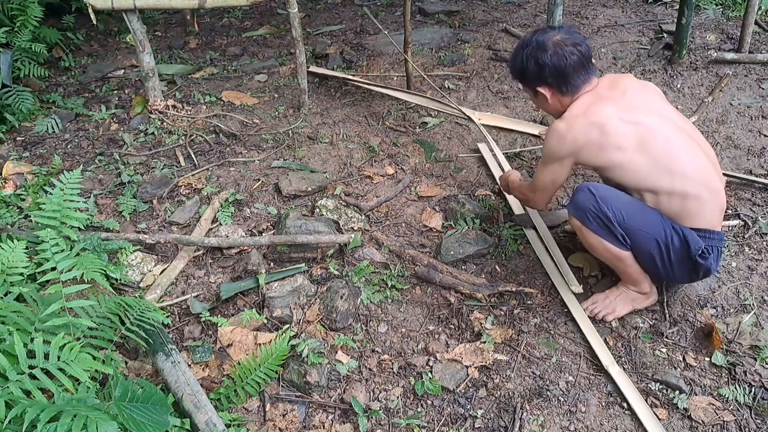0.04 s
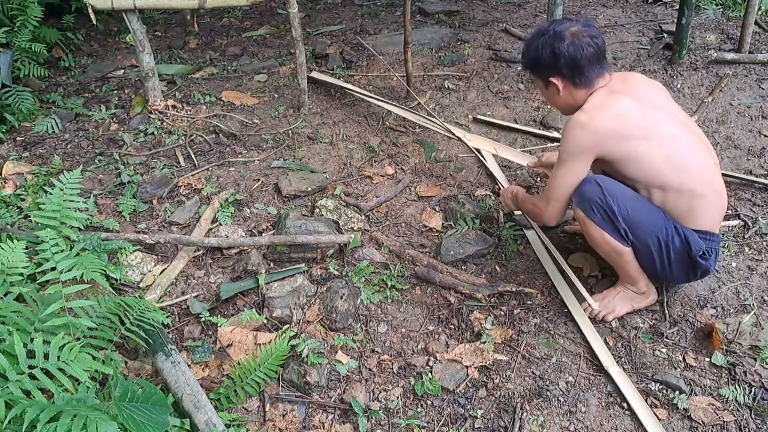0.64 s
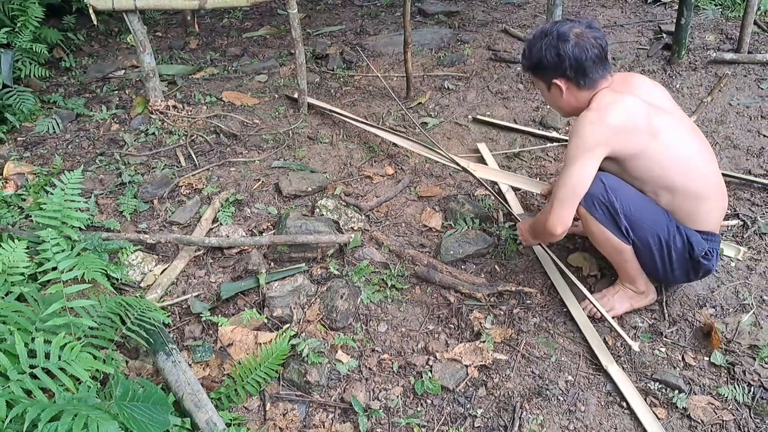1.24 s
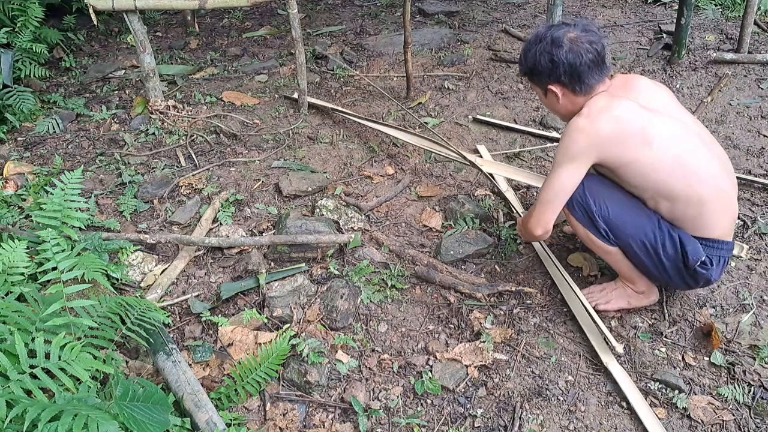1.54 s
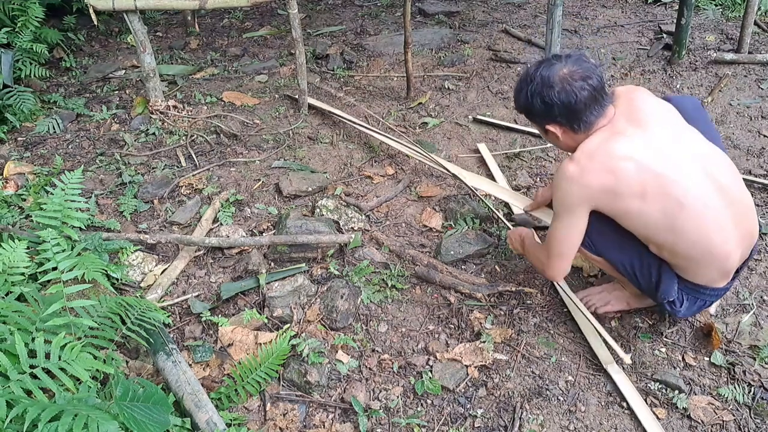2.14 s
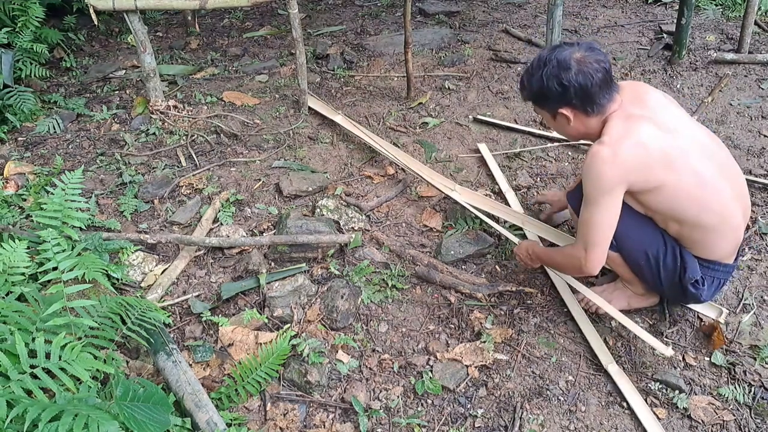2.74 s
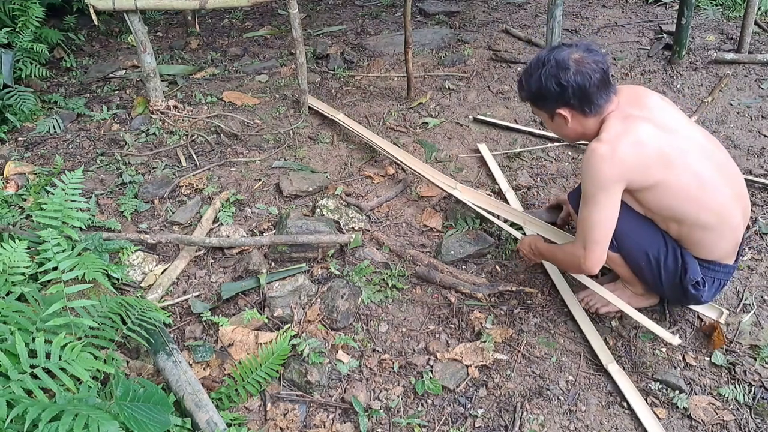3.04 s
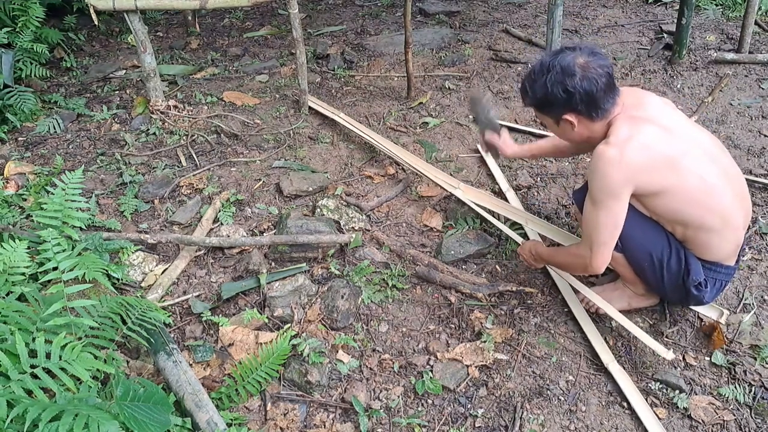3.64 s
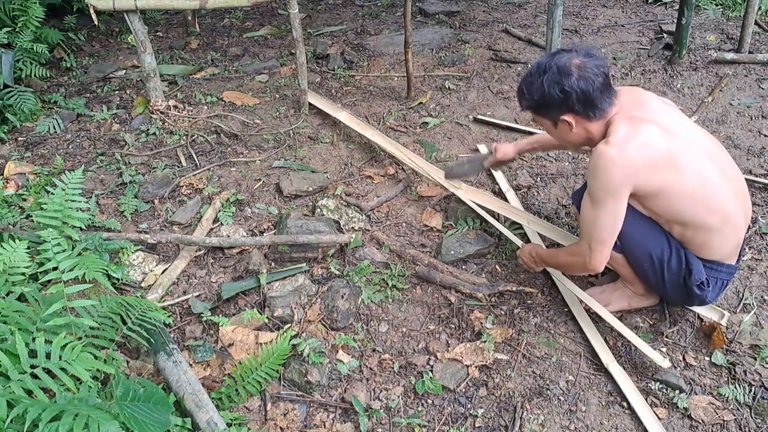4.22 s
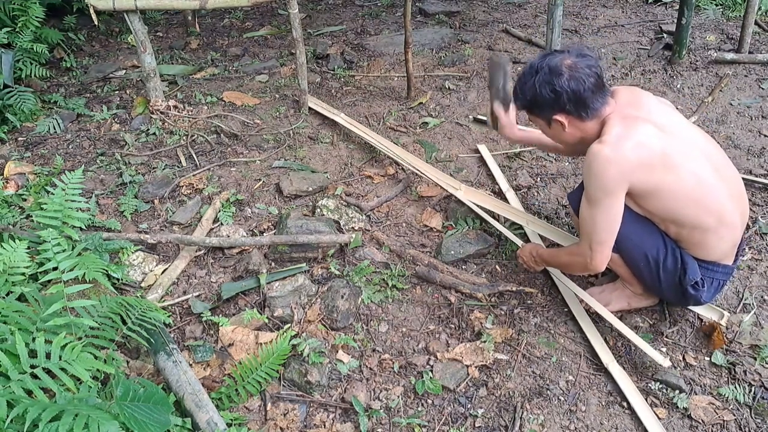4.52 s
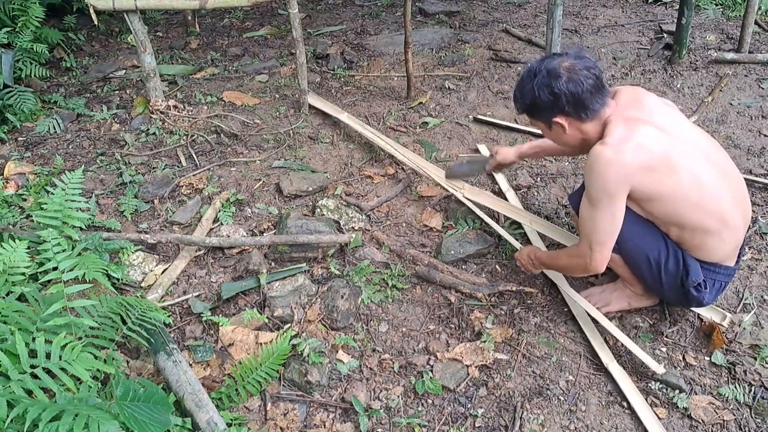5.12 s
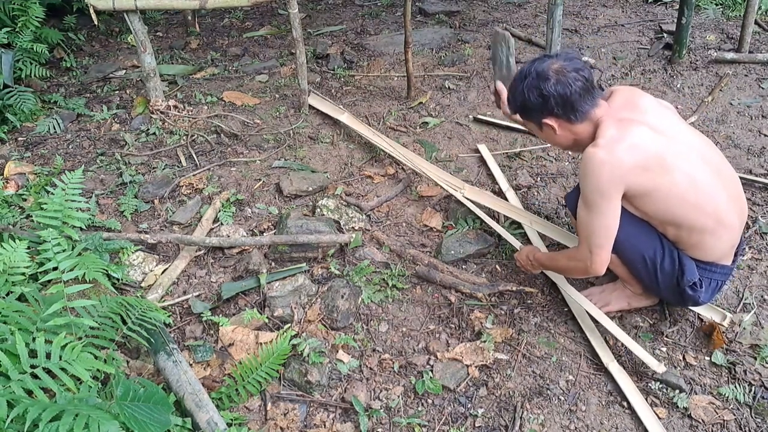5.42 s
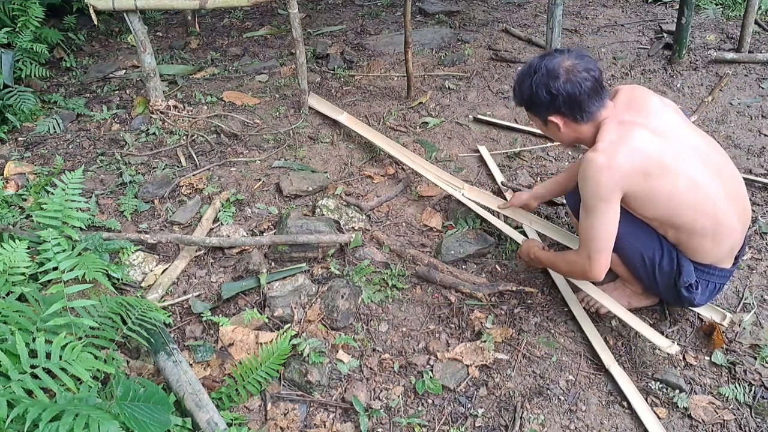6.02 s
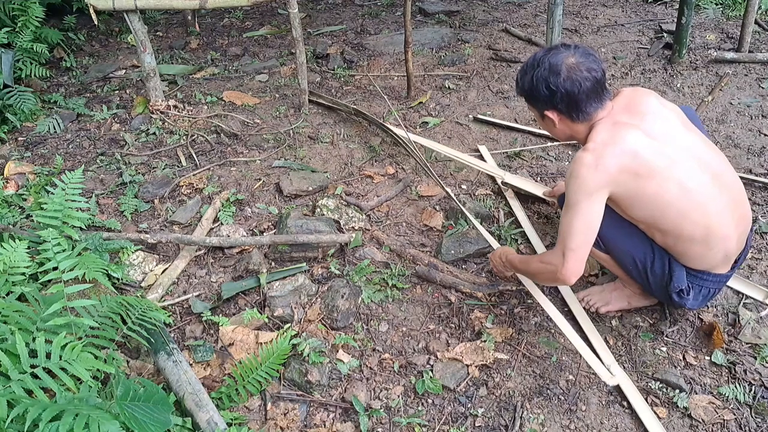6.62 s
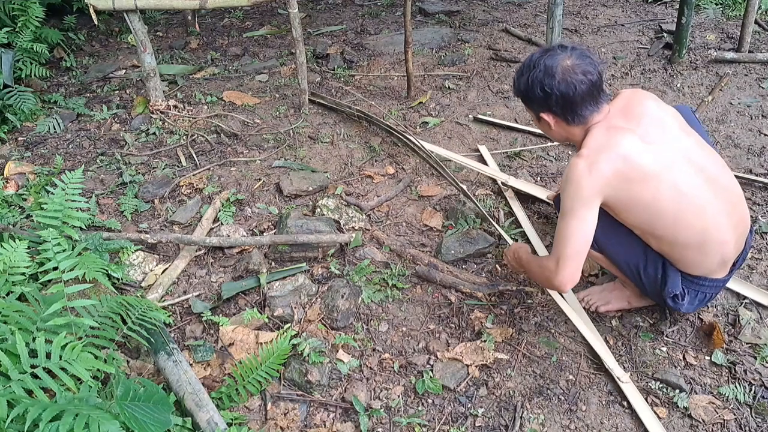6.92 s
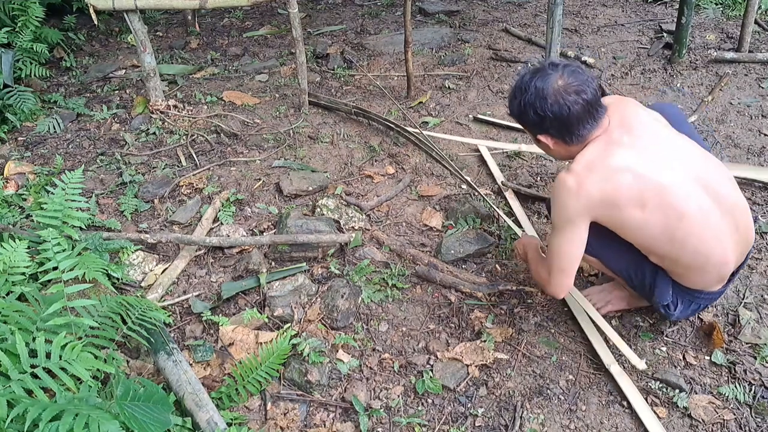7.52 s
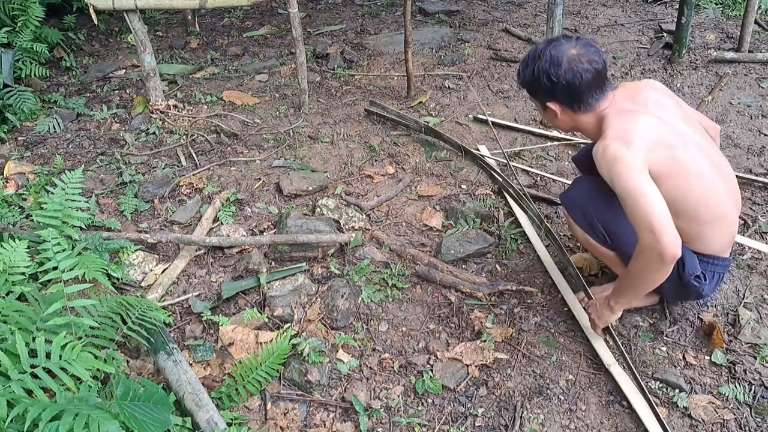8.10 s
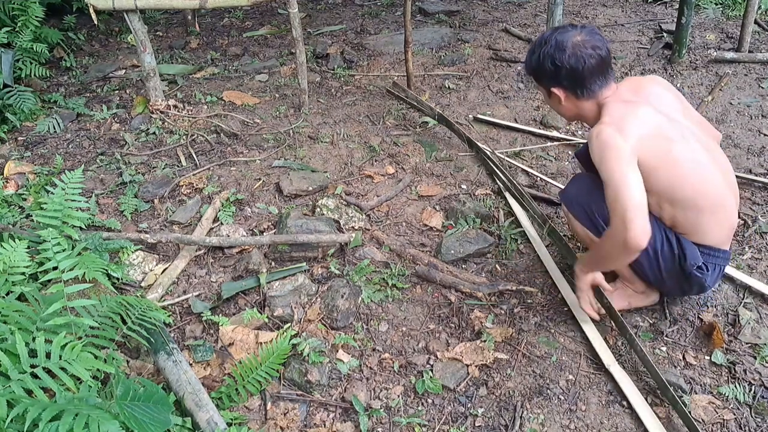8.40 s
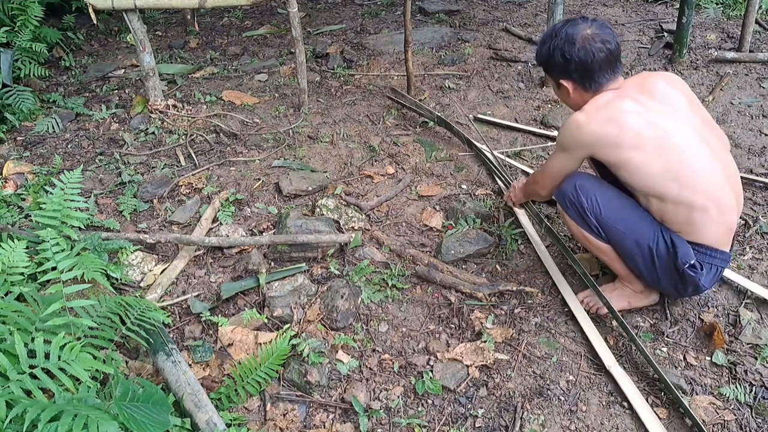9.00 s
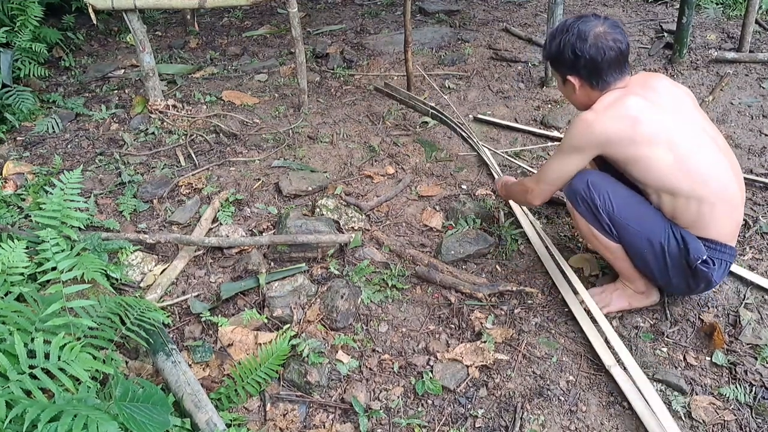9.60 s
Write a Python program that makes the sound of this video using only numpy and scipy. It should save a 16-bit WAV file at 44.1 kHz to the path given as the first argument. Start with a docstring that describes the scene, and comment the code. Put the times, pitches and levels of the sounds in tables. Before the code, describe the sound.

Bamboo strips click and scrape on leafy ground, take four sharp chops, then split briefly, over steady high insect buzz.

```python
"""A heavy blade chops long bamboo strips four times, making them ring and rattle on each other.
Someone works them on a forest floor: the strips click together, thud on the soil and scrape through
dry leaves, twigs snap, and after the chops one strip rips apart fibre by fibre. Insects buzz steadily
in the trees over a distant hush; trunks and leaves scatter every knock back."""
import sys
import numpy as np
from scipy import signal
from scipy.fft import rfft, irfft
from scipy.io import wavfile

SR = 44100
rng = np.random.default_rng(int(sys.argv[2]) if len(sys.argv) > 2 else 0)


def pcm_store(signal):
    """Save signal as 16-bit PCM."""
    levels = np.round(np.clip(np.atleast_2d(signal), -1, 1) * 32767)
    wavfile.write(sys.argv[1], SR, levels.astype(np.int16).T)


N = 429975
TIME = np.arange(N) / SR

# the ways a strip rings; t60 is the time to fade by 60 dB: (pitch [Hz], level [dB], t60 [s])
STRIP_MODES = [(61.7, -16, 0.0966), (123.8, -16, 0.29), (247, -4.5, 0.1), (321, -3.5, 0.13),
               (388.4, -4, 0.13), (537, -3, 0.047), (808.4, 10, 0.14), (1040, -10, 0.083),
               (1250, -13, 0.135), (1279, 12, 0.077), (1538, -8.5, 0.285), (1637, -5, 0.125),
               (1738.4, 11.5, 0.14), (2099, -15.5, 0.17), (2410, 9, 0.15), (2530, 9, 0.183),
               (2550, -3, 0.205), (2910, -14.5, .18), (3670, -43, .22), (4538, -1.5, 0.194), (5250, 1, 0.2),
               (5612, -18.5, .22)]
# tone of the blade's bite and of the rattle after it: (frequency [Hz], level [dB])
BITE_TONE = [(60, -29), (170, -5), (350, 2), (560, -7), (900, -1), (1600, 2.5), (2600, 1.5), (4500, -8.5),
             (7500, -8), (11000, -15.5), (15000, -18.5)]
RATTLE_TONE = [(120, -11), (350, 6.5), (600, 2), (1000, 3.5), (1700, 5), (2600, 4.5), (4500, 1),
               (8000, -2.5), (15000, -14)]
# blows of the blade: (time [s], bite [dB], knock [dB], knock's first pitch [Hz], ring [dB],
# rattle [dB], rattle t60 [s])
CHOPS = [(3.859, -19, -18, 1636, -24, -24.5, 0.18), (4.3023, -19, -14.5, 2350, -22.5, -22.5, 0.1),
         (4.7425, -17, -26, 2420, -26.5, -21.5, 0.12), (5.1973, -19, -15.5, 1876, -25, -21, 0.21)]
def chops(travel_s=0.00596, knock_t60=0.02, bite_t60=0.036, crush_s=0.0072, rattle_rise_s=0.028):
    """The blade lands and crushes fibres for a moment; the strips ring and rattle on each other."""
    out, t = np.zeros((2, N)), TIME[:SR // 2]
    for start, bite_db, knock_db, knock_hz, ring_db, rattle_db, rattle_t60 in CHOPS:
        # high bending waves run along the strip faster than low ones, so the knock falls in pitch
        knock = -np.sin(2 * np.pi * knock_hz * t / (1 + t / travel_s)) * fade(t, knock_t60)
        bite = crackle(per_s=4500, spread_db=0.5, size=len(t))
        bite *= fade(np.maximum(t - crush_s, 0), bite_t60)
        rattle = crackle(per_s=1800, spread_db=3.0, size=len(t))
        rattle *= fade(t, rattle_t60) * (1 - fade(t, rattle_rise_s))
        add(out, start, from_db(knock_db) * with_energy(knock, 0.0044))
        add(out, start, from_db(bite_db) * with_energy(colour(bite, BITE_TONE), 0.021))
        add(out, start, from_db(ring_db) * with_energy(ring(t, STRIP_MODES), 0.007))
        add(out, start, from_db(rattle_db) * with_energy(colour(rattle, RATTLE_TONE), 0.07))
    return out


def ring(t, modes, scatter_db=1.0):
    """A struck strip rings at many pitches; each blow shares its energy out a little differently."""
    hz, db, t60 = np.array(modes).T[:, :, None]
    strength = from_db(db + scatter_db * rng.standard_normal(hz.shape))
    strength[1::2] *= -1   # neighbouring modes swing in opposite directions
    detune = 1 + 0.003 * rng.standard_normal(hz.shape)   # the grip on the strip shifts
    return np.sum(strength * np.sin(2 * np.pi * hz * detune * t) * fade(t, t60), axis=0)


# sharp clicks: (time [s], wood [dB], snap [dB], ring pitch [Hz], ring width [Hz])
CLICKS = [(0.03, -55, -34, 4500, 4000), (.038, -42.5, -51, 4950, 4000), (0.068, -45, -34.5, 2000, 2000),
          (.681, -47, -59, 5470, 4000), (0.7207, -48.5, -49, 2900, 2000), (.834, -49.5, -54, 3480, 3000),
          (0.8638, -45.5, -65, 2400, 800), (0.884, -45, -63, 2730, 1600), (0.9872, -42, -43, 1790, 2500),
          (1.004, -33, -37.5, 1690, 2400), (1.012, -44, -42, 1410, 1500), (1.6497, -52.5, -48, 3000, 3000),
          (2.1862, -45, -57.5, 2700, 900), (2.3346, -34, -58, 2440, 3600), (2.3677, -36.5, -50, 2300, 2200),
          (2.811, -41.5, -50, 2670, 2500), (2.817, -44.5, -61.5, 930, 600), (3.665, -55, -62, 1980, 2500),
          (3.8905, -27, -29.5, 3200, 3500), (3.944, -35.5, -49, 2600, 2200), (4.3097, -33, -24, 2620, 1500),
          (4.318, -24, -34, 4000, 4000), (4.383, -40, -50.5, 2610, 1200), (4.458, -47, -50, 2450, 900),
          (4.7552, -27, -24.5, 3000, 4000), (5.259, -34, -32, 3300, 2980),
          (5.293, -39.5, -45.5, 3500, 3000), (5.858, -43, -62.5, 4300, 3000),
          (5.9044, -39, -49, 5120, 2500), (5.9716, -45, -58.5, 4000, 3000), (6.307, -55, -52, 3000, 3000),
          (6.4, -39, -35, 3000, 3500), (6.472, -35.5, -46, 3400, 1800), (6.8212, -57, -58, 3000, 3000),
          (7.2884, -50.5, -61, 3120, 2500), (7.614, -55, -54, 9300, 1200), (8.0093, -39, -57, 2020, 800),
          (8.036, -47, -62.5, 2020, 500), (8.4, -52.5, -52, 4000, 4000), (8.5318, -55, -51, 5000, 4000),
          (8.5778, -57, -53, 3000, 3000), (8.632, -56, -54, 5000, 4000), (8.9517, -54.5, -56, 1960, 2500),
          (9.0994, -51.5, -51.5, 4700, 3000), (9.344, -50.5, -56, 4400, 3000)]
def clicks(chatter_t60=0.047, first_spike=5.4, snap_hz=9500, hollow_hz=1100, hollow_db=-2.0):
    """Strips knock together, twigs and dry leaves snap: a short chatter with a woody, hollow ring."""
    out, t = np.zeros((2, N)), TIME[:SR // 10]
    for start, wood_db, snap_db, hz, width_hz in CLICKS:
        crack = crackle(per_s=5500, spread_db=4.5, size=len(t)) * fade(t, chatter_t60)
        crack[:, 0] += first_spike
        wood = with_energy(resonate_twice(crack, hz, width_hz), 0.012)
        hollow = with_energy(resonate(crack, hollow_hz, width_hz=810), 0.0048)
        snap = with_energy(resonate(np.diff(crack, prepend=0), snap_hz, width_hz=9000), 0.01)
        add(out, start, from_db(wood_db) * (wood + from_db(hollow_db) * hollow) + from_db(snap_db) * snap)
    return out


# a strip is driven or set down onto the soil: (time [s], level [dB])
THUDS = [(1.004, -57), (2.334, -42), (3.666, -45.5), (3.862, -27.5), (4.304, -23.5), (4.747, -28),
         (5.2, -25)]
def thuds(soil_damping=2.0, mode_count=6):
    """Soft soil stirs only a strip's lowest pitches and stops them fast."""
    out = np.zeros((2, N))
    low_modes = [(hz, db, t60 / soil_damping) for hz, db, t60 in STRIP_MODES[:mode_count]]
    for start, db in THUDS:
        add(out, start, from_db(db) * with_energy(ring(TIME[:SR // 5], low_modes), 0.015))
    return out


# tone of snapping fibres: (frequency [Hz], level [dB])
TEAR_TONE = [(300, -9), (700, -6.5), (1300, -3), (1900, 5.5), (2800, 5.5), (4500, 3), (7500, 5), (10000, 0),
             (14500, 0.5)]
# rips along a strip, before gain_db: (start [s], end [s], first level [dB], last level [dB])
TEARS = [(0.0, 0.095, -49, -44), (5.859, 5.996, -45.5, -53), (6.399, 6.496, -36, -29),
         (7.956, 8.086, -48, -61)]
def tears(let_go_t60=0.06, gain_db=4.5):
    """A split runs along the grain: fibres snap one after another until the last ones let go."""
    out = np.zeros((2, N))
    for start, end, first_db, last_db in TEARS:
        t = TIME[:int((end - start) * SR) + 2]
        pull = from_db(np.linspace(first_db, last_db, len(t)) + gain_db)
        let_go = 1 - fade(t[::-1], let_go_t60)
        add(out, start, pull * let_go * crackle(per_s=2500, spread_db=2.5, size=len(t)))
    return rms_one(colour(out, TEAR_TONE)) * np.std(out)


# tone of scraping bamboo and of dry leaves: (frequency [Hz], level [dB])
SCRAPE_TONE = [(800, -9), (1800, 5), (2700, 4.5), (4000, 5), (6000, 3.5), (9000, -6.5)]
LEAF_TONE = [(4000, -4.5), (7000, -19), (11000, 6), (15000, -5)]
# pushes, before the gains below: (start [s], length [s], scrape [dB], leaf rustle [dB])
SLIDES = [(0.0, 0.12, -52.5, -50), (.195, 0.02, -57, -55), (.68, .16, -52.5, -70),
          (1.025, 0.043, -49.5, -53), (1.12, .13, -59.5, -59), (1.39, 0.05, -56.5, -63),
          (1.64, 0.034, -53.5, -50), (2.18, .1, -52.5, -56), (2.3, .07, -45.5, -57),
          (2.68, .05, -54.5, -64), (2.92, .02, -59, -63), (3.22, 0.035, -55, -55),
          (6.76, 0.053, -61, -54.5), (7.12, .04, -64, -62), (7.37, .07, -56.5, -58), (7.72, 0.11, -61, -60),
          (7.87, 0.044, -61, -53.5), (7.965, .12, -53.5, -52.5), (8.36, 0.065, -62, -60),
          (8.56, 0.052, -58, -64), (9.0, 0.11, -63, -59), (9.3, .28, -62.5, -66), (9.73, .02, -58, -52)]
def slides(scrape_gain_db=-1.0, leaf_gain_db=-4.0, catch_db=-8, rise_db_per_s=310, fall_db_per_s=250):
    """Strips slide over each other: they scrape, catch on splinters and crinkle the dry leaves."""
    scrape = rms_one(colour(crackle(per_s=1200, spread_db=4.0, size=N), SCRAPE_TONE))
    leaves = rms_one(colour(crackle(per_s=700, spread_db=5.0, size=N), LEAF_TONE))
    catches = rms_one(resonate(crackle(per_s=45, spread_db=3.0, size=N), hz=4500, width_hz=6000))
    scrape += from_db(catch_db) * catches
    scrape_db, leaf_db = -80, -76   # the strips and leaves never lie quite still
    for start, length, push_db, rustle_db in SLIDES:
        # a push gathers speed, holds, then friction stops it
        rise_db = rise_db_per_s * (TIME - start)
        fall_db = fall_db_per_s * (start + length - TIME)
        swell_db = np.minimum(rise_db, fall_db).clip(max=0)
        scrape_db = np.maximum(scrape_db, push_db + swell_db)
        leaf_db = np.maximum(leaf_db, rustle_db + swell_db)
    return from_db(scrape_db + scrape_gain_db) * scrape + from_db(leaf_db + leaf_gain_db) * leaves


# tone of the echo: (frequency [Hz], level [dB])
ECHO_TONE = [(100, -5.5), (400, -13.5), (1200, -8.5), (3000, -9.5), (7000, -9.5), (14000, -7.5)]
# how long the echo lasts: (frequency [Hz], t60 [s])
ECHO_T60 = [(100, 0.43), (1000, 0.26), (3000, 0.335), (7000, 0.408), (14000, 0.375)]
# the left microphone faces away from the work, so it hears less: (frequency [Hz], level [dB])
LEFT_SHADE = [(100, -1.5), (450, -2), (1000, -4), (2500, -3), (4500, -4), (8000, -2.5), (12000, -.5)]
def among_trees(sound, build_s=0.008, left_lag_ms=0.11):
    """Sound reaches the right side first, then comes back from trunks and leaves."""
    echo, edges_hz = 0, np.geomspace(60, 17000, num=9)
    for low, high in zip(edges_hz, edges_hz[1:]):
        band = signal.butter(2, [low, high], "band", fs=SR, output="sos")
        t60 = at_hz(ECHO_T60, np.sqrt(low * high))
        echo = echo + signal.sosfilt(band, reflections(t60, build_s))
    paths = from_all_sides(echo, ECHO_TONE)[:, :SR // 2]
    paths[0, round(left_lag_ms * SR / 1000)] += 1   # the straight path to each side
    paths[1, 0] += 1
    left, right = signal.fftconvolve(sound, paths, axes=1)[:, :N]
    return np.array([colour(left, LEFT_SHADE), right])


def reflections(t60, build_s):
    """Many tiny echoes, left and right, build up and die away."""
    t = TIME[:int(0.6 * SR)]
    shape = fade(t, t60) * (1 - fade(t, build_s))
    sides = [grains(per_s=7400, spread_db=1.5, size=len(t)) * shape for side in "LR"]
    return np.array([with_energy(side, 1 / SR) for side in sides])


# kinds of insect: (pitch [Hz], width [Hz], relative level [dB])
INSECTS = [(5360, 220, -26), (6980, 500, 4), (7100, 200, -12), (7420, 290, 3.5), (7850, 220, 3),
           (7973, 60, 2.5), (8305, 310, 1.5)]
def insects(times, level_db, left_db=-0.5, right_db=5.5):
    """Far insects click tiny drum skins so fast that they buzz, each kind at its own pitch."""
    chorus = np.zeros((2, N))
    for side in chorus:
        for hz, width_hz, db in INSECTS:
            ticks = grains(per_s=1800, spread_db=4.0, size=N)
            side += from_db(db) * rms_one(resonate_twice(ticks, hz, width_hz))
    return rms_one(chorus) * from_db(np.interp(TIME, times, level_db)) * from_db([[left_db], [right_db]])


# one insect's thin whine: (time [s], level [dB])
WHINE = [(2.2, -82), (3.4, -76.5), (4.7, -68), (5.1, -83)]
def lone_insect(hz=4930, width_hz=200):
    """A single insect swells out of the chorus and stops."""
    buzz = resonate_twice(crackle(per_s=3000, spread_db=1.0, size=N), hz, width_hz)
    times, level_db = np.transpose(WHINE)
    return rms_one(buzz) * np.interp(TIME, times, from_db(level_db), left=0, right=0)


# tone of the forest air: (frequency [Hz], level [dB])
AIR_TONE = [(25, -35), (55, -13.5), (90, -12.5), (135, 0.5), (250, 1.5), (400, -6), (800, -3.5),
            (2000, -10.5), (3200, -17.5), (6000, -17.5), (9500, -26), (15000, -33.5)]
def air(times, level_db, gain_db=3.5):
    """Distant forest hush, a little stronger on the right."""
    left, right = from_all_sides(rng.standard_normal((2, N)), AIR_TONE)
    hush = rms_one(np.array([colour(left, LEFT_SHADE), right]))
    return hush * from_db(np.interp(TIME, times, level_db) + gain_db)


# how alike left and right are: (frequency [Hz], likeness [0 to 1])
LIKENESS = [(60, 1), (290, 0.82), (640, 0.19), (1400, 0.026), (15000, 0.085)]
def from_all_sides(pair, tone):
    """Turn two unrelated noises into sound from all around: alike left and right only in the bass."""
    size = pair.shape[1]
    hz = np.arange(size // 2 + 1) * SR / size
    alike = at_hz(LIKENESS, hz)
    mid, side = rfft(pair) * from_db(at_hz(tone, hz))
    return irfft(np.sqrt((1 + alike) / 2) * mid + np.sqrt((1 - alike) / 2) * side * [[1], [-1]], size)


def crackle(per_s, spread_db, size, apart_hz=1900, apart_db=-1.0):
    """Tiny clicks in stereo: the bass arrives alike, the treble differs from side to side."""
    treble = signal.butter(2, apart_hz, "high", fs=SR, output="sos")
    apart = signal.sosfilt(treble, grains(per_s, spread_db, size))
    return rms_one(grains(per_s, spread_db, size) + from_db(apart_db) * apart * [[1], [-1]])


def grains(per_s, spread_db, size):
    """Tiny clicks of uneven strength at random moments."""
    strength = from_db(spread_db * np.minimum(rng.exponential(1, size), 4))
    return rms_one(strength * rng.choice([-1, 1], size) * (rng.random(size) < per_s / SR))


def colour(x, tone, size=4096):
    """Give a sound the tone in a table, without smearing it earlier (a minimum-phase filter)."""
    hz = np.arange(size // 2 + 1) * SR / size
    cepstrum = irfft(np.log(from_db(at_hz(tone, hz))))
    cepstrum[1:size // 2] *= 2
    cepstrum[size // 2 + 1:] = 0
    response = np.array(irfft(np.exp(rfft(cepstrum))), ndmin=x.ndim)
    return signal.fftconvolve(x, response, axes=-1)[..., :x.shape[-1]]


def resonate(x, hz, width_hz):
    """Make a sound ring at one pitch; a narrower width rings longer."""
    r = np.exp(-np.pi * width_hz / SR)
    feedback = [1, -2 * r * np.cos(2 * np.pi * hz / SR), r * r]
    return signal.lfilter(np.array([1, 0, -1]) * (1 - r * r) / 2, feedback, x + 1e-18)


def resonate_twice(x, hz, width_hz):
    return resonate(resonate(x, hz, width_hz), hz, width_hz)


def from_db(db):
    return 10 ** (np.asarray(db) / 20)


def rms_one(x):
    """Scale a sound to an average (rms) level of 1."""
    return x / np.sqrt(np.mean(x ** 2) + 1e-20)


def with_energy(x, seconds):
    """Give a burst the energy of a level of 1 held for this long."""
    return x * np.sqrt(seconds * SR / (np.mean(x ** 2) * x.shape[-1] + 1e-20))


def at_hz(table, hz):
    """Read between the rows of a frequency table."""
    row_hz, values = np.transpose(table)
    return np.interp(np.log(np.maximum(hz, 1)), np.log(row_hz), values)


def fade(t, t60):
    return np.exp(-np.log(1000) * t / t60)


def add(track, start, sound):
    """Mix a sound into a stereo track at a time in seconds."""
    i = int(round(start * SR))
    track[:, i:i + sound.shape[-1]] += sound[..., :N - i]


# the recorder turns the background down during the chops, then lets it recover;
# levels before each source's own gain: (time [s], insects [dB], air [dB])
BACKGROUND_LEVELS = [(0.0, -61, -55.5), (0.46, -60, -57), (1.25, -59, -57), (2.96, -59.5, -56.5),
                     (3.42, -59, -57.5), (3.99, -61, -57), (5.62, -63, -60), (6.98, -60, -56.5),
                     (9.75, -59, -57.5)]
def scene():
    """The work on the bamboo echoes among the trees, with insects and air behind it."""
    times, insect_db, air_db = np.transpose(BACKGROUND_LEVELS)
    work = chops() + clicks() + thuds() + tears() + slides()
    return among_trees(work) + air(times, air_db) + insects(times, insect_db) + lone_insect()


def record(dry, cutoff_hz=15350):
    """Round off the loudest peaks and cut the highest treble."""
    low_pass = signal.ellip(12, 0.1, 80, cutoff_hz, fs=SR, output="sos")
    return signal.sosfilt(low_pass, np.tanh(dry))


dry = scene()
out = record(dry)
pcm_store(out)
```